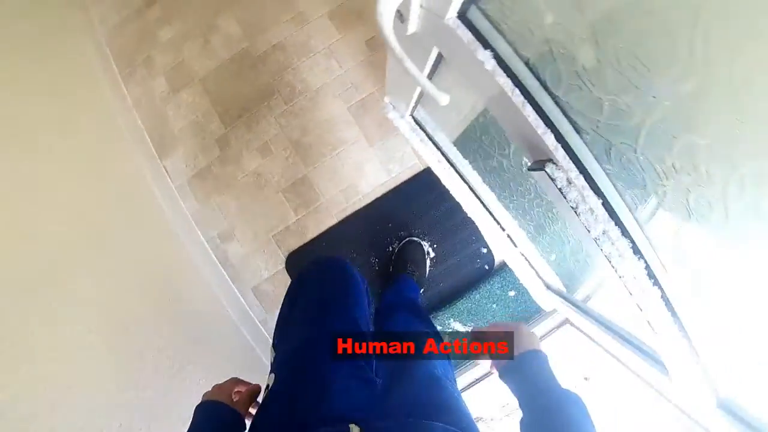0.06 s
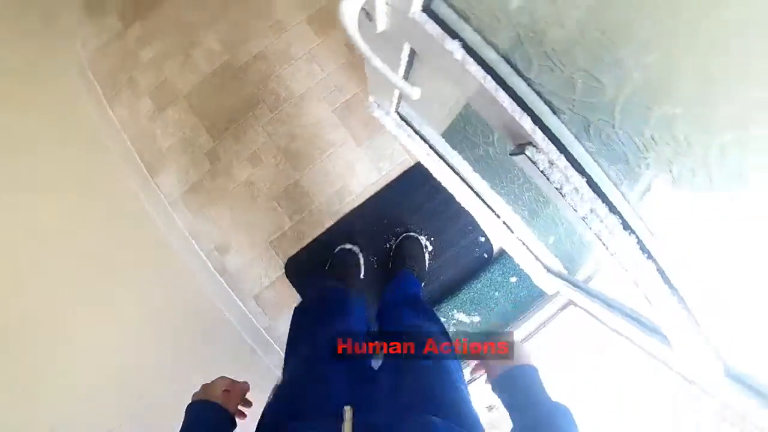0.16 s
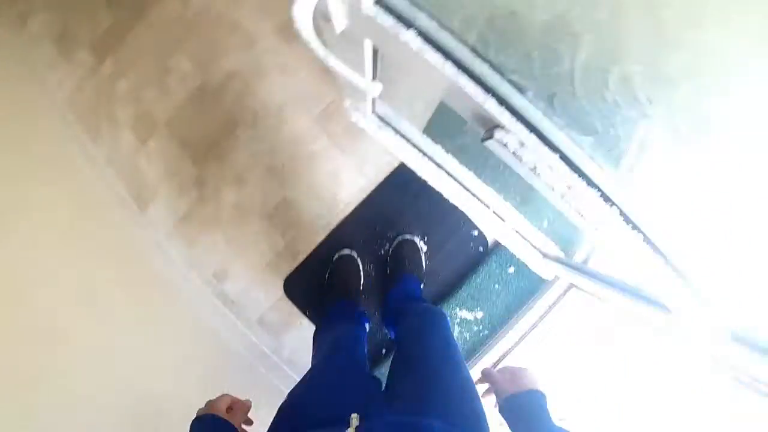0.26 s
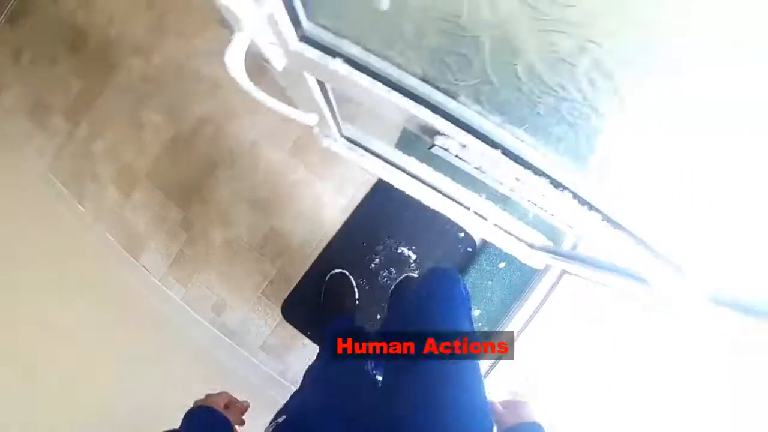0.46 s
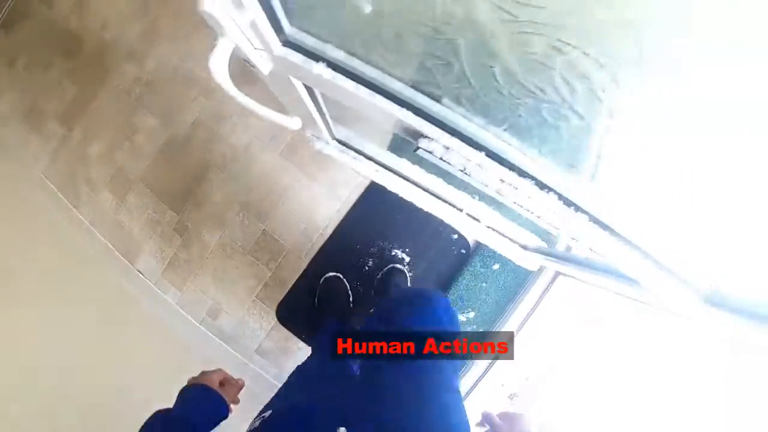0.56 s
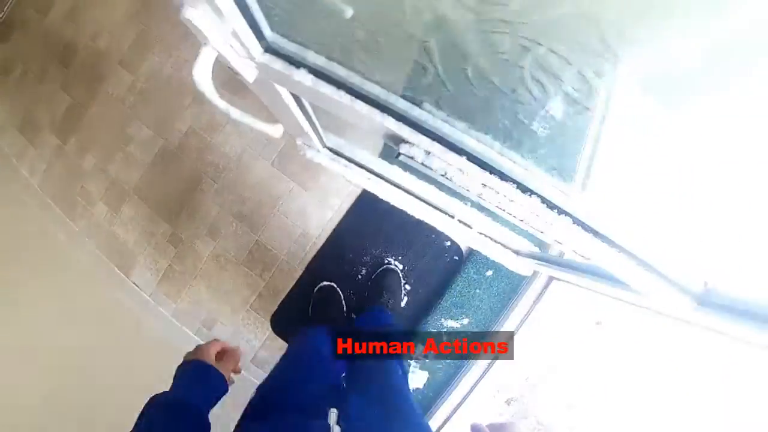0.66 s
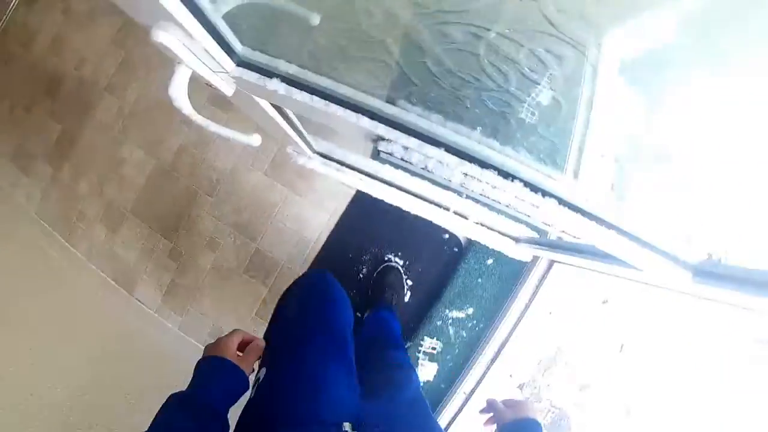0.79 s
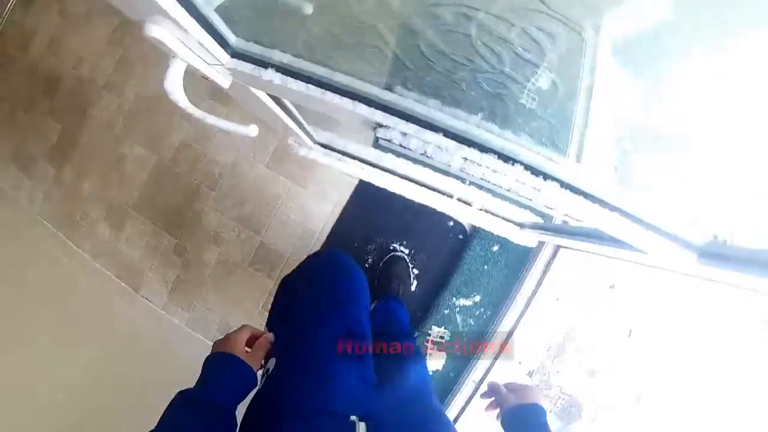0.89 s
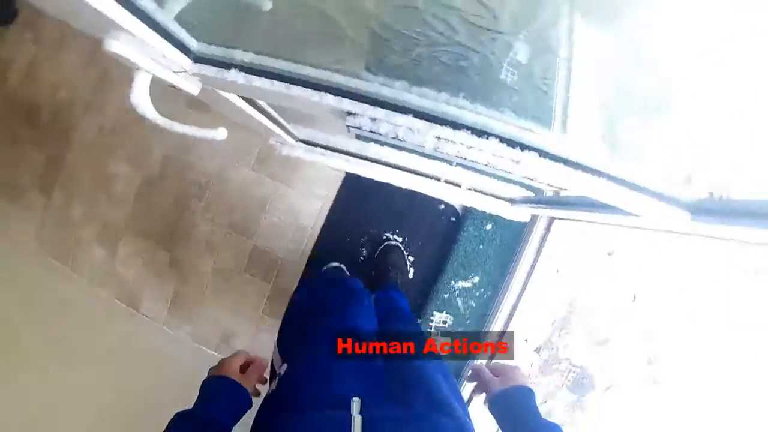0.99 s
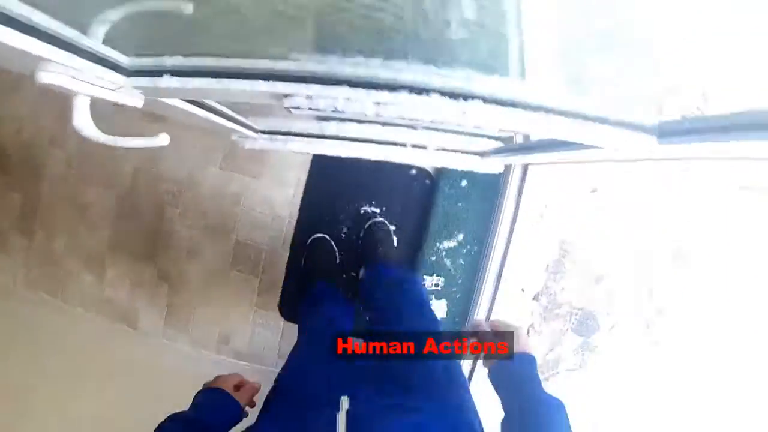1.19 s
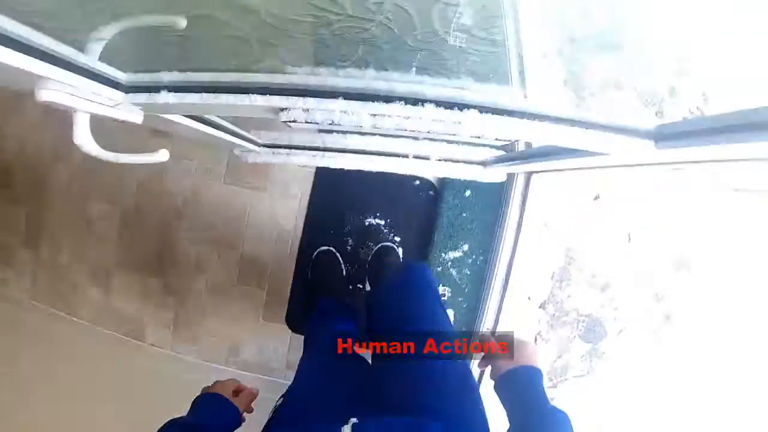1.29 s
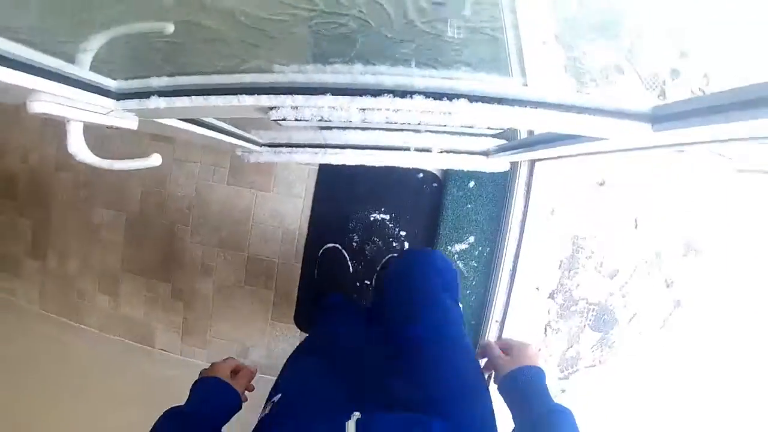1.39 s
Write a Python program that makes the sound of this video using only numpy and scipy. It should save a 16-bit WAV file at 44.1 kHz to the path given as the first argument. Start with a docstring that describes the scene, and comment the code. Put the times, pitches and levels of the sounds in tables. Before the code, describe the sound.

Three stamps of shoes on a doormat boom and distort on a close, body-worn microphone in a hallway. The lighter middle one squeaks briefly. A loose part ticks and clothes rustle faintly after each, over low hum and hiss.

```python
"""Snowy shoes stamp three times on a doormat by an open door: heavy, light with a wet squeak, heavy.
Each stamp swings the floor into a deep boom while the tread scuffs the pile and the sole slaps down.
The booms overload the microphone of a body-worn camera; after each jolt a loose part ticks and the
clothes rustle. A low hum and the microphone's hiss lie underneath."""
import sys
import numpy as np
from scipy import signal
from scipy.fft import rfft, irfft, next_fast_len
from scipy.io import wavfile

SR = 44100
rng = np.random.default_rng(int(sys.argv[2]) if len(sys.argv) > 2 else 0)


def put_to_file(sound):
    """Save the sound as 16-bit audio at rate SR, in the file named by the first command-line argument."""
    columns = np.atleast_2d(sound).T  # one column per channel
    safe = np.clip(columns, -1, 1)
    whole_steps = np.round(safe * 32767)
    wavfile.write(sys.argv[1], SR, whole_steps.astype(np.int16))


N = 63945

# The three stamps. Each row: start in seconds, boom level in dB, boom pitch in Hz, floor ring in dB,
# ring length factor, sole slap in dB, hallway tail in dB.
STAMPS = [(0.1933, 24, 40.37, 5.5, 0.87, -32, -43.5), (0.607, 10, 66.2, -6.5, 1.67, -46.5, -43.5),
          (1.0806, 24.5, 42.2, 4.5, 0.91, -28.5, -40)]
# The colour of rubbing cloth, also used for the ticks' crack. Each row: frequency in Hz, gain in dB.
CLOTH_SPECTRUM = [(300, -13), (800, -23), (1350, 6), (1800, 0), (2100, -4.5), (2600, 1.5), (3300, -13.5),
                  (5000, -24), (10000, -33)]


def amp(db):
    """Decibels as a linear gain."""
    return 10 ** (np.asarray(db) / 20)


def since(start):
    """Seconds since the start, zero before it."""
    return np.maximum(np.arange(N) / SR - start, 0)


def burst(t, rise, hold, t60):
    """An envelope that swells and, once the hold is over, falls 60 dB in t60; all times in seconds."""
    return (1 - np.exp(-(t / rise) ** 2)) * 1000. ** (-np.maximum(t - hold, 0) / t60)


def ring(t, hz, t60, rise):
    """One damped mode: a sine that swells and dies away."""
    return np.sin(2 * np.pi * hz * t) * burst(t, rise, 0, t60)


def filtered(x, response):
    """Equalise x with a gain given as a function of frequency in Hz."""
    size = next_fast_len(N + SR // 2)
    return irfft(rfft(x, size) * response(np.fft.rfftfreq(size, 1 / SR)), size)[:N]


def noise(spectrum):
    """Noise of rms 1, coloured by points of frequency in Hz and gain in dB."""
    points_hz, db = np.transpose(spectrum)
    white = rng.standard_normal(N)
    coloured = filtered(white, lambda hz: amp(np.interp(np.log(hz + 1), np.log(points_hz), db)))
    return coloured / coloured.std()


def hum_and_hiss():
    """A steady bed of noise: a low hum under room air and microphone hiss."""
    # The colours of hum and hiss. Each row: frequency in Hz, gain in dB.
    hum_spectrum = [(10, -4), (22, 5), (40, -2), (62, -6), (90, -14.5), (140, -25.5), (300, -37.5),
                    (1000, -68)]
    hiss_spectrum = [(100, 2.5), (300, -1.5), (600, -7), (950, -10.5), (1350, -10), (2000, -13),
                     (4000, -18.5), (8000, -22.5), (15500, -27.5)]
    return amp(-36) * noise(hum_spectrum) + amp(-51.5) * noise(hiss_spectrum)


def sole_slaps():
    """The tread scuffs the mat's pile and the sole lands with a dull puff that lingers in the hallway."""
    # The colours of scuff, slap and hallway tail. Each row: frequency in Hz, gain in dB.
    scuff_spectrum = [(300, -19), (600, -2), (950, -3), (1400, -0.5), (2100, -15.5), (2800, -11),
                      (4500, -29), (9000, -47)]
    slap_spectrum = [(60, -8.5), (175, 1.5), (270, 0), (370, 0), (500, -8.5), (600, -8), (720, -7.5),
                     (900, -16), (1300, -10.5), (2100, -28.5), (2900, -33), (4200, -46.5), (10000, -63.5)]
    tail_spectrum = [(100, -6), (250, -7), (600, -3), (900, -7), (1300, 3), (1800, -5), (2100, -15.5),
                     (2700, -9), (4500, -34), (9000, -44)]
    scuff, slap, tail = np.zeros((3, N))
    for start, *_, slap_db, tail_db in STAMPS:
        t = since(start - 0.0025)  # the sole touches just ahead of the boom
        scuff += amp(-42.5) * burst(t, rise=0.0012, hold=0.012, t60=0.059)
        slap += amp(slap_db) * burst(t, rise=0.0027, hold=0.015, t60=0.077)
        tail += amp(tail_db) * burst(since(start), rise=0.019, hold=0, t60=0.63)
    return slap * noise(slap_spectrum) + tail * noise(tail_spectrum) + scuff * noise(scuff_spectrum)


def floor_booms():
    """Mat and floor give under the heel in one big, damped swing; the light stamp rings longest."""
    # The heel's hollow knock. Each row: pitch in Hz, dB relative to the boom, t60 and swell in seconds.
    heel_modes = [(174, -41, .09, 0.016), (373.2, -52, .11, 0.013), (712.6, -61, 0.17, .01)]
    # The floor's low modes. Each row: pitch in Hz, relative level in dB, base t60 and swell in seconds.
    floor_modes = [(14.85, -7, 0.57, 0.049), (30.7, -6, 0.35, 0.051), (50.99, -5.5, 0.25, 0.017),
                   (94.7, -13.5, .1, 0.0083)]
    decay_cycles, swell_cycles = 3.5, 1.05
    out = np.zeros(N)
    for start, boom_db, boom_hz, ring_db, length, _, _ in STAMPS:
        t = since(start)
        decay, swell = decay_cycles / boom_hz, swell_cycles / boom_hz
        boom = ring(t, boom_hz, decay, swell)
        sag = amp(-15.5) * ring(t, 0.334 * boom_hz, decay, swell)  # a slower swing under the boom
        heel = sum(amp(db) * ring(t, hz, t60, rise) for hz, db, t60, rise in heel_modes)
        floor = sum(amp(db) * ring(t, hz, length * t60, rise) for hz, db, t60, rise in floor_modes)
        out += amp(boom_db) * (boom + sag + heel) + amp(ring_db) * floor
    return out


def loose_ticks():
    """A small loose part, perhaps on the camera's mount, knocks three times after each jolt."""
    # The hits. Each row: start in seconds, level in dB, dull knock trim in dB, bright ping trim in dB.
    hits = [(0.2312, -24, 2.5, -7), (0.2843, -28, 1, 0.5), (0.3941, -29, -1, 1.5), (0.643, -32, -2, -12),
            (0.7102, -28.5, -1.5, -6.5), (0.8173, -32, 2.5, 7.5), (1.1192, -23, -7.5, -4.5),
            (1.1795, -22, 2.5, -0.5), (1.2908, -34, 1, 7)]
    # The part's low, middle and high modes. Each row: pitch in Hz, relative level in dB, t60 in seconds.
    knock_modes = [(227.3, -12.5, 0.047), (321, -12.5, 0.027), (493, -17, 0.035)]
    clack_modes = [(1274, -2, 0.017)]
    ping_modes = [(1767, -2.5, 0.017), (2750, -8.5, 0.0081), (3750, -19, 0.01)]
    rise_s, detune = 0.0011, 0.012

    def strike(t, modes):
        """Ring the modes, each slightly detuned at random."""
        return sum(amp(db) * ring(t, hz * rng.normal(1, detune), t60, rise_s) for hz, db, t60 in modes)

    out, grit = np.zeros(N), noise(CLOTH_SPECTRUM)
    for start, level_db, knock_db, ping_db in hits:
        t = since(start)
        knock = amp(knock_db) * strike(t, knock_modes)
        clack = strike(t, clack_modes)
        ping = amp(ping_db) * strike(t, ping_modes)
        crack = amp(-12.5) * grit * burst(t, rise_s, hold=0, t60=0.016)
        out += amp(level_db) * (knock + clack + ping + crack)
    return out


def clothing_rustles():
    """Cloth brushes on cloth as the legs settle."""
    # The brushes. Each row: centre in seconds, level in dB, half width in seconds.
    brushes = [(0.328, -46.5, 0.0089), (0.444, -56.5, 0.011), (0.753, -51, 0.013), (1.143, -47.5, 0.0073),
               (1.228, -46, 0.0088)]
    t = np.arange(N) / SR
    swells = sum(amp(db) * np.exp(-0.5 * ((t - centre) / width) ** 2) for centre, db, width in brushes)
    return swells * noise(CLOTH_SPECTRUM)


def wet_squeak():
    """Wet rubber slips for a few milliseconds, its pitch rising as the weight comes on."""
    from_hz, to_hz, glide_s = 914, 1398, 0.002
    t = since(0.6052)  # on the light stamp
    hz = to_hz + (from_hz - to_hz) * np.exp(-t / glide_s)
    phase = 2 * np.pi * np.cumsum(hz * (t > 0)) / SR
    tone = np.sin(phase) + amp(-29) * np.sin(2 * phase)
    return amp(-22) * tone * burst(t, rise=0.00042, hold=0.0023, t60=0.03)


def hallway(x):
    """A short, diffuse answer from the walls."""
    tail = rng.standard_normal(N) * burst(since(0), rise=0.0019, hold=0, t60=0.18)
    return signal.fftconvolve(x, tail / np.linalg.norm(tail))[:N]


def scene():
    """The mono mix: stamps and their small after-sounds over the bed; squeak and ticks feed the reverb."""
    squeak, ticks = wet_squeak(), loose_ticks()
    reverb = amp(-10) * hallway(squeak + amp(-6) * ticks)
    bed = hum_and_hiss()
    return (floor_booms() + sole_slaps() + squeak + ticks + clothing_rustles() + reverb + bed)[None]


def record(dry):
    """The preamp clips, its bass roll-off tilts the flat tops, and the peaks clip again at full scale."""
    # A faint, even hiss that carries on through the overloads. Each row: frequency in Hz, gain in dB.
    faint_hiss_spectrum = [(1000, -2), (15500, -5.5)]
    preamp_ceiling, coupling_hz, top_hz = 1.03, 23.8, 15800
    clipped = np.clip(dry[0], -preamp_ceiling, preamp_ceiling)
    tilted = signal.lfilter(*signal.butter(1, coupling_hz, "high", fs=SR), clipped)
    with_hiss = np.clip(tilted, -1, 1) + amp(-67) * noise(faint_hiss_spectrum)
    return filtered(with_hiss, lambda hz: hz < top_hz)[None]


dry = scene()
out = record(dry)
put_to_file(out)
```